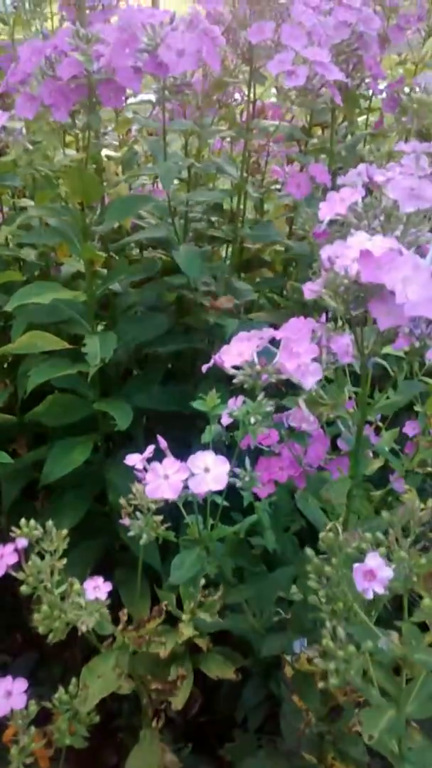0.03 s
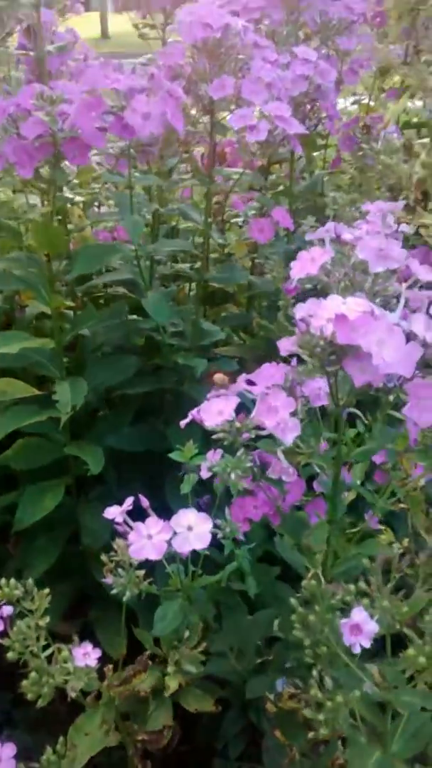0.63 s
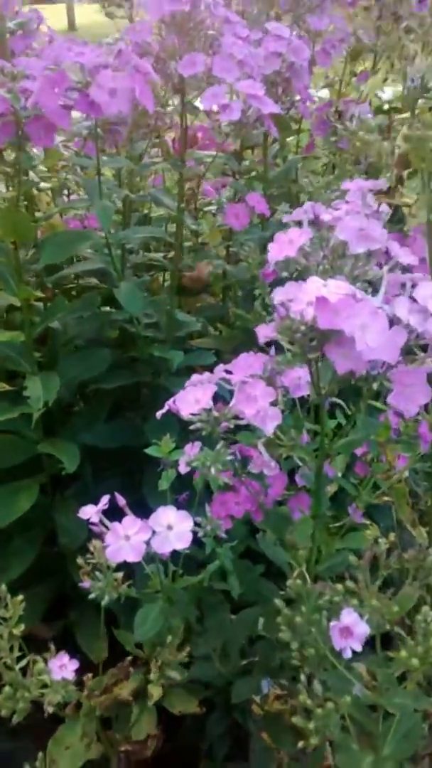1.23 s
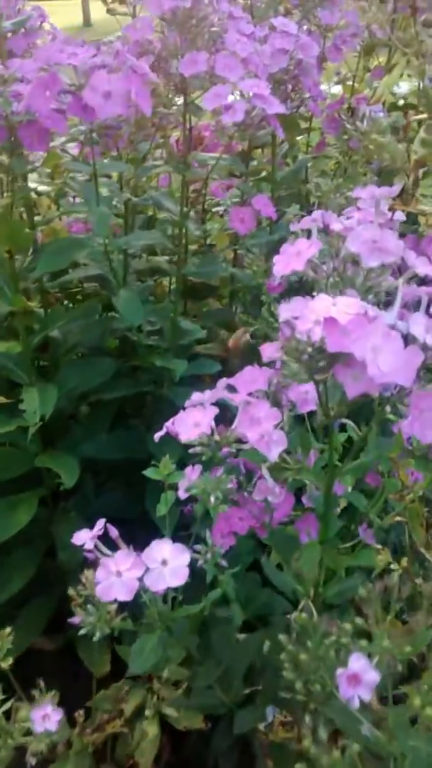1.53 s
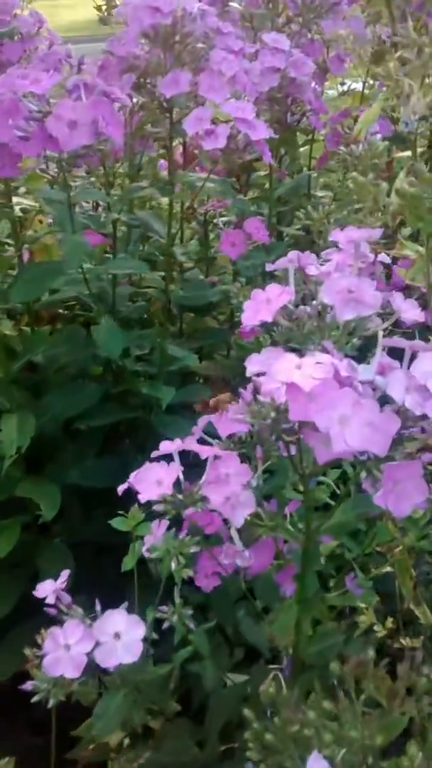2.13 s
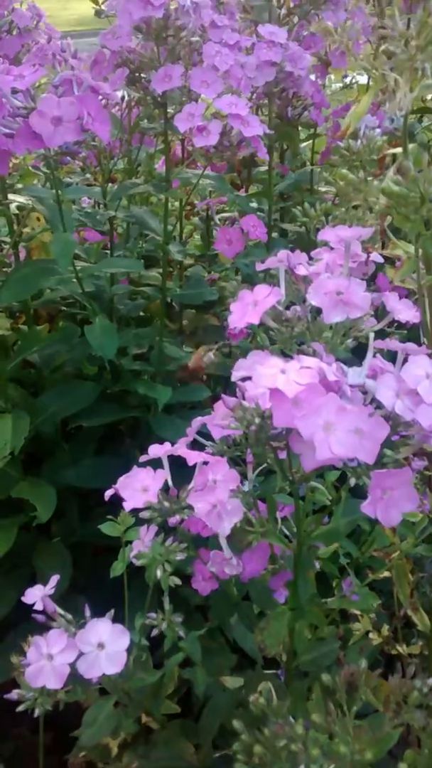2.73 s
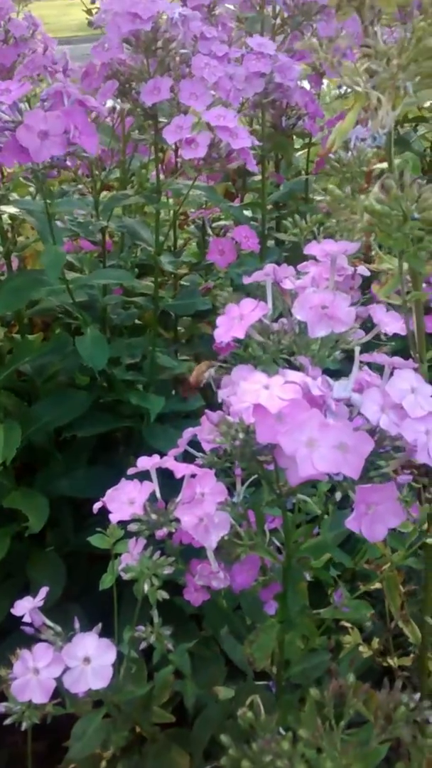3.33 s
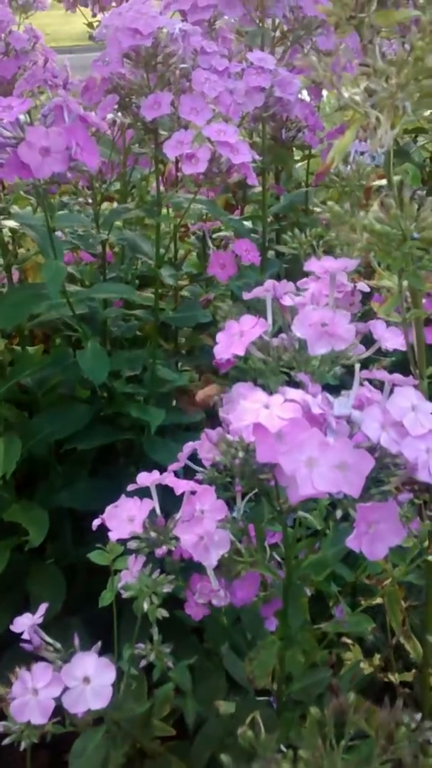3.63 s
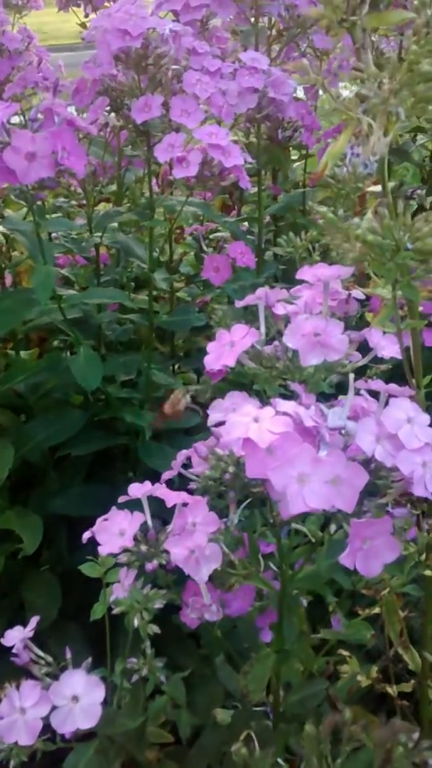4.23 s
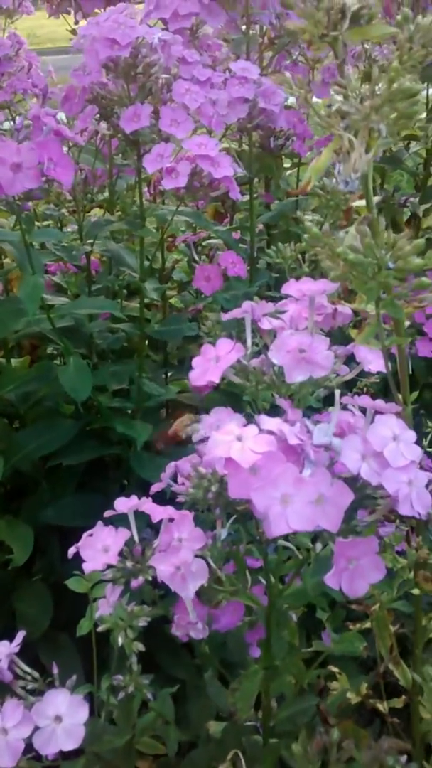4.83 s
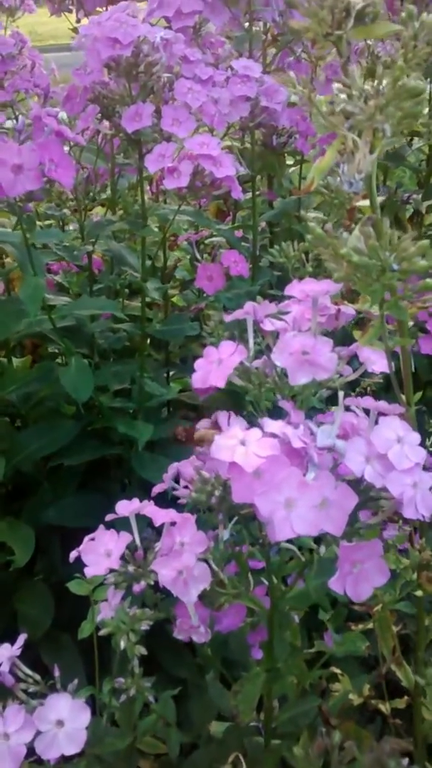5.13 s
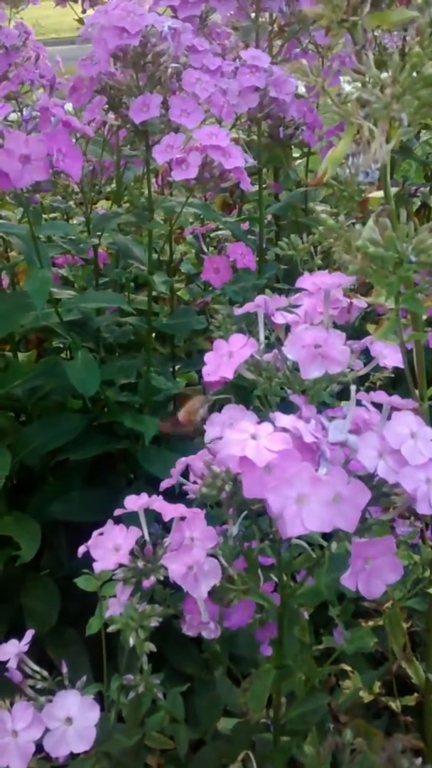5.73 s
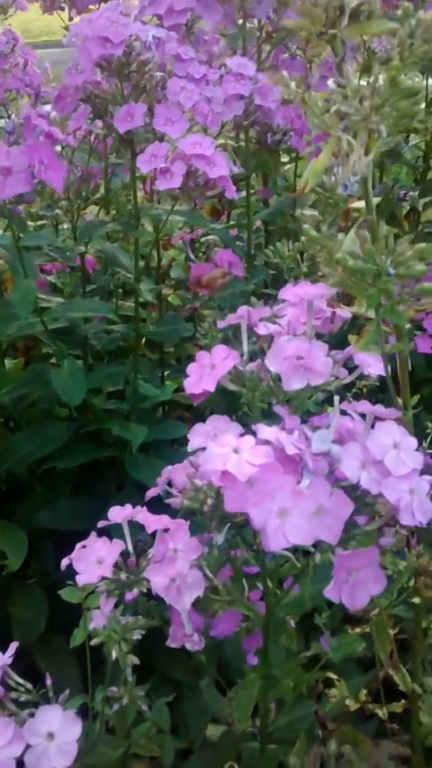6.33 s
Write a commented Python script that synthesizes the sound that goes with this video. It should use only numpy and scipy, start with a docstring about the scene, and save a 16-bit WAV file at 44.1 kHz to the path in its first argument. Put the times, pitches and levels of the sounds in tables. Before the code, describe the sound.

A quiet outdoor chorus of crickets, one chirping in double notes, with far traffic and a faint engine drone underneath.

```python
"""Crickets sing in a flower garden on a late summer day by scraping their wings together.
One chirps in double notes, a few small ones tick out rows of short notes, and several trill in a chorus.
Far traffic rumbles and an engine drones, faint tones drift in, and leaves rustle briefly.
The hand-held microphone hisses, catches a few puffs of air and is bumped once."""
import sys
import numpy as np
from scipy import signal
from scipy.fft import rfft, irfft, next_fast_len
from scipy.io import wavfile

SR = 44100
rng = np.random.default_rng(int(sys.argv[2]) if len(sys.argv) > 2 else 0)


def waveform_to_disk(signal):
    """Save audio, clipped to [-1, 1], as 16-bit WAV at the path in sys.argv[1]."""
    frames = np.transpose(np.atleast_2d(signal))
    scaled = np.clip(frames, -1, 1) * 32767
    samples = np.round(scaled).astype(np.int16)
    wavfile.write(sys.argv[1], SR, samples)


N = 290178
TIME = np.arange(N) / SR
BINS_HZ = np.maximum(np.arange(N // 2 + 1) * SR / N, 1)

# Bouts of trilling. Each row: start, end and fade-in time in seconds, strokes per second, share of each
# stroke that sounds, starting pitch in Hz, fall in pitch in Hz, level in dB, left over right in dB.
TRILLS = [(-3, 7.06, 6.1, 71.8, .66, 5560, 660, -56.5, 1.7), (-.5, 7, .3, 59.8, .56, 6080, 1300, -59.5, 10),
          (1.66, 3.08, 0.56, 72.4, 0.46, 6270, 900, -59, 6.9),
          (4, 5.4, 0.83, 72.6, .45, 6200, 940, -61, 5.5), (0, 0.59, .15, 74, .45, 6170, 580, -60, 5.5),
          (2.4, 3.4, 0.98, 68, .5, 7300, 690, -64.5, 2), (4.5, 8.3, 0.89, 89, .5, 5750, 750, -64, 7.9)]
# Runs of ticks. Each row: first and last tick in seconds, top pitch in Hz, level in dB,
# how much softer the run starts in dB.
TICK_RUNS = [(.005, 1.465, 6990, -55.2, 7.5), (1.799, 1.799, 6720, -59.5, 0),
             (1.969, 1.969, 6670, -59.5, 0), (2.072, 3.082, 6820, -59.7, 2), (.047, 2.4, 7380, -70.5, 1),
             (2.467, 3.976, 7400, -68, 0), (3.35, 5.032, 6900, -71, 0), (5.276, 6.518, 7380, -69.5, 3),
             (5.44, 6.497, 6700, -70, 3)]
# Double chirps. Each row: the main note's middle in seconds, top pitch in Hz and level in dB,
# then the lead note's top pitch in Hz, level in dB and length in seconds.
CHIRPS = [(.637, 4330, -51.5, 4220, -52, 0.017), (1.431, 4310, -50, 4170, -51, .013),
          (1.941, 4340, -46.8, 4250, -49, 0.021), (2.431, 4360, -47, 4220, -51.5, .015),
          (2.81, 4380, -46, 4220, -51, .015), (3.188, 4410, -46, 4160, -52, .015),
          (3.588, 4380, -46.5, 4170, -51.5, .011), (4.022, 4420, -46, 4240, -51.5, .016),
          (4.622, 4350, -46, 4200, -50.5, .012), (5.04, 4360, -47, 4250, -49, 0.016),
          (5.456, 4410, -47, 4250, -50, .016), (6.071, 4370, -46, 3800, -57, 0.0062)]
# Passing cars. Each row: time when nearest in seconds, tyre level in dB.
CARS = [(1.7, -52.5), (3.15, -54.5), (5.15, -56.5)]
# Bumps on the microphone. Each row: start and length in seconds, pitch in Hz, peak level in dB.
BUMPS = [(0.148, .036, 52, -27)]
# Faint far tones. Each row: start and length in seconds, pitch and its blur in Hz, level in dB.
FAR_TONES = [(0.39, 0.14, 1380, 95, -61.5), (0.645, 0.4, 942, 65, -59.5), (0.731, 0.31, 556, 62.3, -55.5),
             (1.42, 0.75, 565.5, 65, -54), (1.42, 0.32, 524, 80, -57.5), (2.1, 0.35, 540.5, 70, -60),
             (2.3, 0.48, 493, 35, -60.5), (3.2, .35, 489, 35, -63), (2.85, 0.76, 536, 99, -62.5),
             (2.751, 0.83, 999, 110, -61), (3.62, 0.39, 1340, 37, -65.5), (4.869, 0.23, 1345, 33, -65.5),
             (5.1, 0.29, 996, 28, -59.5), (5.721, 1.097, 741, 28, -61), (1.199, 0.26, 1056, 95, -59.5),
             (1.72, 0.33, 801, 30, -66), (1.97, 0.15, 1213, 70, -63.5), (2.748, 0.26, 958, 50, -60.5),
             (5.0, 0.32, 530, 45, -61.5), (5.751, 0.2, 1320, 50, -66)]
# The microphone's thin whistles. Each row: pitch in Hz, level in dB.
WHISTLES = [(7279, -80), (14557, -83)]

# Sounds that swell briefly. Each row: start in seconds, length in seconds, level in dB.
RUMBLE_HEAVES = [(2.83, 0.1, -54), (3.17, 0.18, -56)]
ENGINE_PULLS = [(.95, 0.23, -59), (1.35, .62, -54), (2.12, 0.88, -54.5), (3.05, 0.72, -55.5),
                (4.65, .45, -63), (6.22, 0.13, -52)]
AIR_PUFFS = [(.03, 0.26, -45), (.39, 0.16, -47), (.74, 0.11, -50)]
LEAF_RUSTLES = [(0.405, 0.046, -58.5), (.42, 0.2, -60.3), (1.03, 0.26, -63.5)]

# The colour of each noise, its mix of low and high. Each row: frequency in Hz, relative strength in dB.
FAR_CRICKET_COLOUR = [(4100, -34), (4600, -18), (5100, -2), (5350, 11), (5650, -5), (5950, 10), (6250, -16),
                      (6800, -11), (7600, -25), (9000, -53)]
DEEP_COLOUR = [(12, -19), (25, -6), (42, -1.5), (58, -9), (85, -11), (300, -33), (1000, -78)]
RUMBLE_COLOUR = [(35, -15.5), (62, 0.5), (80, 1.5), (95, -1), (115, -1), (135, -1), (155, -1.5), (220, -7),
                 (320, -11.5), (600, -32.5), (2000, -63)]
TYRE_COLOUR = [(200, -9), (380, -1), (530, 1.5), (750, -1), (1020, -3.5), (1300, -9), (1700, -14),
               (2200, -18), (2800, -65), (5000, -52)]
PUFF_COLOUR = [(10, -12), (25, 0), (45, 0), (70, -7), (150, -31), (600, -73)]
LEAF_COLOUR = [(900, -14), (1400, 5), (2400, 8.5), (3400, 8.5), (4500, -3), (9000, -13)]
HISS_COLOUR = [(1500, 3.2), (2600, 9), (3300, 10.4), (4500, 7.3), (8000, 5.15), (11000, 4.6), (15000, 3.1)]

# How alike the two channels are in the lows. Each row: frequency in Hz, likeness (1 means the same).
LOW_LIKENESS = [(25, 0.17), (60, 0.087), (110, 0.7), (270, 0.16), (500, 0.49), (750, 0.63), (1100, 0.95)]
# How far that likeness ripples in the highs. Each row: frequency in Hz, depth from 0 to 1.
LIKENESS_RIPPLE = [(1200, 0.77), (2500, 1), (3600, 0.51), (5000, 0.03), (9000, 0.43), (12000, 0.3),
                   (15000, 1)]
# Which side the traffic leans to. Each row: frequency in Hz, left over right in dB.
TRAFFIC_BALANCE = [(25, -10), (70, 7), (400, 5.5), (740, 4), (1200, -1.5), (2100, -3), (4000, 1)]


def from_db(db):
    """Turn decibels into a number to multiply by."""
    return 10 ** (np.asarray(db) / 20)


def rms_one(x):
    """Scale a signal so its average power is 1."""
    return x / np.sqrt(np.mean(x ** 2) + 1e-20)


def at_bins(points):
    """Read a table at every frequency, joining its rows on a log scale."""
    hz, value = np.transpose(points)
    return np.interp(np.log(BINS_HZ), np.log(hz), value)


def drift(rate_hz):
    """A smooth random wobble, about 1 in size, that moves at up to about rate_hz."""
    hop = 50  # samples between random values
    steps = next_fast_len(N // hop + 2)
    hz = np.arange(steps // 2 + 1) * SR / hop / steps
    slow = irfft(rfft(rng.standard_normal(steps)) / (1 + (hz / rate_hz) ** 4), steps)
    return np.interp(np.arange(N) / hop, np.arange(steps), rms_one(slow))


def pan(left_db):
    """Make the left channel left_db louder than the right, keeping the total power."""
    gains = np.vstack([from_db(left_db / 2), from_db(-left_db / 2)])
    return gains / np.sqrt(np.mean(gains ** 2, axis=0))


def likeness(lag_s=.000385):
    """Each channel also hears the other's opening, late and flipped, so their likeness ripples."""
    ripple = -at_bins(LIKENESS_RIPPLE) * np.cos(2 * np.pi * BINS_HZ * lag_s)
    return np.where(BINS_HZ < 1200, at_bins(LOW_LIKENESS), ripple)


def noise(colour, alike, left_db):
    """Stereo noise of a given colour; alike runs from -1 (opposite channels) to 1 (the same)."""
    shared, opposed = rfft(rng.standard_normal((2, N)))
    alike = np.clip(alike, -1, 1)
    ears = np.sqrt(1 + alike) * shared + np.sqrt(1 - alike) * opposed * [[1], [-1]]
    return rms_one(irfft(ears * pan(left_db) * from_db(at_bins(colour)), N))


def add(out, start, sound):
    """Mix a sound in, beginning at start seconds."""
    at = int(np.clip(start * SR, 0, N))
    out[at:at + len(sound)] += sound[:N - at]


def swells(rows):
    """A loudness curve that rises and falls once for each row."""
    out = np.zeros(N)
    for start, length, db in rows:
        add(out, start, from_db(db) * np.hanning(int(length * SR)) ** 0.23)
    return out


def garden(song, left_db, lag_s, scatter_db, tail_s):
    """A song reaches the right ear lag_s late, and leaves scatter it into a short echo."""
    t = np.arange(int(.25 * SR)) / SR
    tail = rng.standard_normal((2, len(t))) * from_db(-60 * t / tail_s)
    tail /= np.sqrt(np.sum(tail ** 2, axis=1, keepdims=True))
    direct = np.array([song, np.interp(TIME - lag_s, TIME, song)])
    scattered = signal.fftconvolve(song[None], tail, axes=1)[:, :N]
    return pan(left_db) * (direct + from_db(scatter_db) * scattered)


def trill(per_s, sounding_share, start_hz, fall_hz):
    """Fast wing strokes: each slides down in pitch, then the wing opens again in silence."""
    strokes = np.cumsum(per_s * (1 + .014 * drift(4))) / SR
    progress = np.minimum(strokes % 1 / sounding_share, 1)
    hz = start_hz - fall_hz * progress ** 1.6 + 50 * drift(49.3)  # falls ever faster
    loudness = np.sin(np.pi * progress) * from_db(1.34 * drift(30))
    return rms_one(loudness * np.sin(2 * np.pi * np.cumsum(hz) / SR))


def trilling_crickets():
    """Two crickets keep trilling and others join in bouts, over a blur of countless far ones."""
    out = from_db(-59.5) * noise(FAR_CRICKET_COLOUR, likeness(), left_db=6.5)
    fade_out_s = 0.54
    for start, end, fade_in_s, per_s, sounding_share, start_hz, fall_hz, db, left_db in TRILLS:
        effort = np.clip(np.minimum((TIME - start) / fade_in_s, (end - TIME) / fade_out_s), 0, 1)
        song = effort * trill(per_s, sounding_share, start_hz, fall_hz)
        out += from_db(db) * garden(song, left_db, lag_s=.00051, scatter_db=-5.5, tail_s=0.07)
    return out


def traffic():
    """A steady far roar of tyres swells as cars pass, and the rumble follows it a little."""
    steady_db, half_power_s = -52, 0.56
    passing = sum(from_db(db) ** 2 / (1 + ((TIME - nearest) / half_power_s) ** 2) for nearest, db in CARS)
    tyre_swell_db = 10 * np.log10(1 + passing / from_db(steady_db) ** 2)
    rumble_swell_db = 0.17 * tyre_swell_db
    alike, left_db = likeness(), at_bins(TRAFFIC_BALANCE)
    deep_loudness = from_db(-58 + rumble_swell_db + 1.5 * drift(2.7)) + swells(RUMBLE_HEAVES)
    deep = deep_loudness * noise(DEEP_COLOUR, alike, left_db)
    rumble = from_db(-49.5 + rumble_swell_db) * noise(RUMBLE_COLOUR, alike, left_db)
    tyres = from_db(steady_db + tyre_swell_db) * noise(TYRE_COLOUR, alike, left_db)
    return deep + rumble + tyres


def engine(firing_hz=96.2, flutter_hz=5.1, idle_db=-60.5):
    """A far engine's firing note arrives by several paths, so it flutters."""
    phase = 2 * np.pi * np.cumsum(firing_hz + .8 * drift(4.54)) / SR
    paths = 1 + 0.26 * (drift(flutter_hz) + 1j * drift(flutter_hz))  # shakes loudness and phase
    firing = rms_one(np.real(paths * np.exp(1j * phase)))
    return (from_db(idle_db) + swells(ENGINE_PULLS)) * firing * pan(7.6)


def wing_stroke(length, top_hz, crest, bend_hz, late_peak, rough, flick_hz=0):
    """One wing closing: pitch follows the scraper's speed, arching up to a crest and falling off."""
    progress = np.linspace(0, 1, int(length * SR))
    hz = top_hz - bend_hz * (progress - crest) ** 2 - flick_hz * progress ** 8
    grip = np.interp(progress, np.linspace(0, 1, 8), rng.standard_normal(8))
    loudness = np.sqrt(np.abs(np.sin(np.pi * progress ** late_peak))) * (1 + rough * grip)
    return rms_one(loudness * np.sin(2 * np.pi * np.cumsum(hz) / SR))


def ticking_crickets():
    """Small crickets far to the left tick evenly; some runs start softer and lower, then build up."""
    ticks_per_s, tick_s, warm_up_s, hz_per_db = 13.05, .021, 0.316, 41
    song = np.zeros(N)
    for first, last, hz, db, softer_db in TICK_RUNS:
        for middle in np.linspace(first, last, round((last - first) * ticks_per_s) + 1):
            late_s, sharp_hz, extra_db = rng.standard_normal(3) * [0.0012, 25.6, 0.5]
            effort_db = -softer_db * max(1 - ((middle - first) / warm_up_s) ** 2, 0)
            top_hz = hz + hz_per_db * effort_db + sharp_hz  # harder strokes are higher
            note = wing_stroke(tick_s, top_hz, crest=0.423, bend_hz=1800, late_peak=1.05, rough=0.12)
            add(song, middle - tick_s / 2 + late_s, from_db(db + effort_db + extra_db) * note)
    return garden(song, left_db=16, lag_s=.00052, scatter_db=-9, tail_s=0.12)


def puffs_and_bump():
    """Puffs of air and a soft bump on the microphone push its two channels opposite ways."""
    thud = np.zeros(N)
    for start, length, hz, db in BUMPS:
        t = TIME[:int(length * SR)]
        add(thud, start, from_db(db) * np.hanning(len(t)) * np.sin(2 * np.pi * hz * t))
    puffs = swells(AIR_PUFFS) * noise(PUFF_COLOUR, alike=-1, left_db=3)
    return puffs + thud * pan(2.7) * [[1], [-1]]


def far_tones(arch=0.1178):
    """Tones swell, arch a little in pitch and fade, blurred by distance."""
    out = np.zeros(N)
    for start, length, hz, blur_hz, db in FAR_TONES:
        progress = np.linspace(0, 1, int(length * SR))
        phase = 2 * np.pi * np.cumsum(hz * (1 - arch * (progress - .55) ** 2)) / SR
        blur = (drift(blur_hz / 2) + 1j * drift(blur_hz / 2))[:len(progress)]
        tone = np.real(blur * np.exp(1j * phase))
        loudness = np.sqrt(np.abs(np.sin(np.pi * progress)))
        add(out, start, from_db(db) * rms_one(loudness * tone))
    return out * pan(3.3)


def leaves():
    """Leaves brush together in short, grainy rustles."""
    grain = from_db(2.5 * drift(120))
    return swells(LEAF_RUSTLES) * grain * noise(LEAF_COLOUR, likeness(), left_db=-2)


def chirping_cricket():
    """Two wing strokes: a short, low lead note, then a longer, higher one. Each ends flicking down."""
    main_s, main_bend_hz, lead_bend_hz = 0.024, 750, 550
    ahead_s = 0.042  # from the lead note's end to the main note's middle
    song = np.zeros(N)
    for middle, main_hz, main_db, lead_hz, lead_db, lead_s in CHIRPS:
        lead = (middle - ahead_s - lead_s / 2, lead_s, lead_hz, lead_bend_hz, lead_db)
        main = (middle, main_s, main_hz, main_bend_hz, main_db)
        for at, usual_s, hz, bend_hz, db in (lead, main):
            longer, deeper = rng.standard_normal(2)
            length = usual_s * np.exp(0.03 * longer)
            note = wing_stroke(length, hz, crest=0.45, bend_hz=bend_hz, late_peak=1.34, rough=0.23,
                               flick_hz=220 * np.exp(.15 * deeper))
            add(song, at - length / 2, from_db(db) * note)
    return garden(song, left_db=2.5, lag_s=.00007, scatter_db=-15, tail_s=0.07)


def scene():
    """Mix the crickets with the sounds around them."""
    return (trilling_crickets() + traffic() + engine() + ticking_crickets()
            + puffs_and_bump() + far_tones() + leaves() + chirping_cricket())


def record(dry):
    """The microphone adds hiss and two thin whistles, and the highest treble is cut off."""
    whistles = sum(from_db(db) * rms_one(np.sin(2 * np.pi * hz * TIME)) for hz, db in WHISTLES)
    hiss = from_db(-59) * noise(HISS_COLOUR, likeness(), left_db=-0.5)
    sound = dry + hiss + whistles * pan(5)
    cutoff_hz = 15480
    return irfft(rfft(sound) / np.sqrt(1 + (BINS_HZ / cutoff_hz) ** 900), N)


dry = scene()
out = record(dry)
waveform_to_disk(out)
```